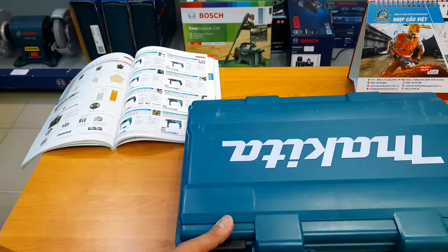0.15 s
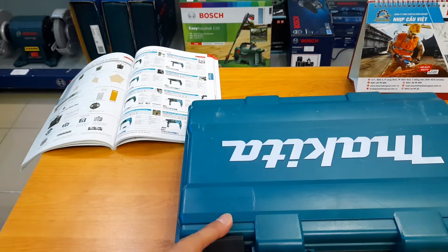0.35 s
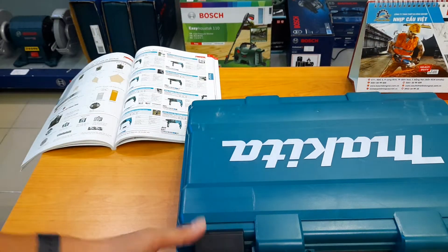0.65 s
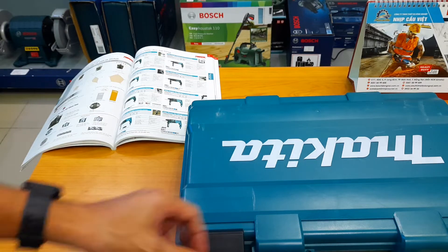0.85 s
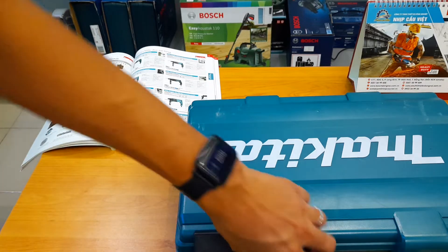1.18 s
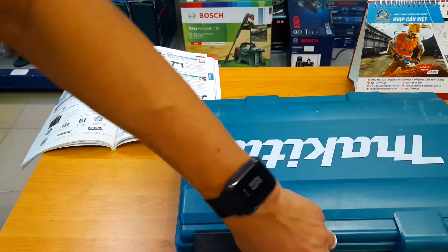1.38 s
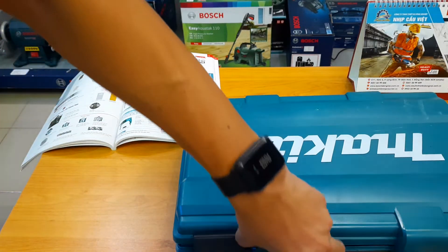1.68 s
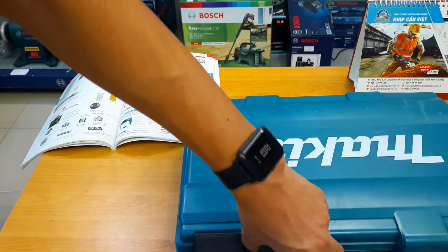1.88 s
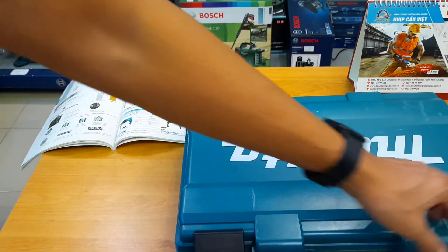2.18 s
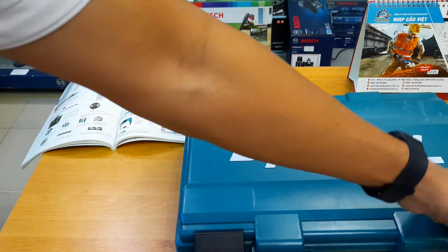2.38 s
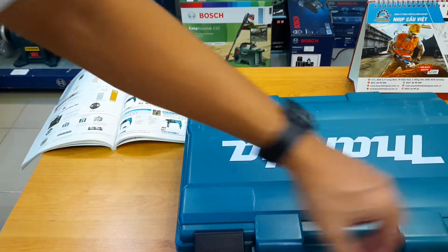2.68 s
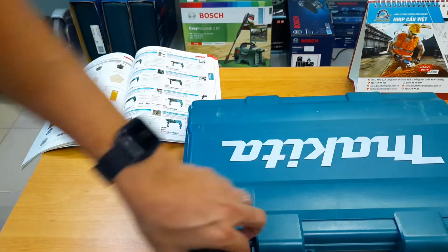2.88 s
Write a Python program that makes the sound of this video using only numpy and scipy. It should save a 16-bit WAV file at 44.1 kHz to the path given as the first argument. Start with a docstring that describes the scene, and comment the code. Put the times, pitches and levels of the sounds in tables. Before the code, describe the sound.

Hard plastic case latches unsnap close to a hand-held camera: faint finger taps, a sharp snap, a latch ping, handling bumps, then more hollow snaps and light ticks, over soft ventilation in a reverberant shop.

```python
"""Over a low ventilation hush and hum, a faint skin squeak and finger taps lead to the first snaps of a
hard plastic tool case, close to a hand-held camera. A latch ping and taps follow, then bumps and a squeak,
then more snaps with taps and bumps between them, and last a few light ticks.
Snaps and taps are short noise cracks that ring a hollow shell of decaying sines and noise; a long noise
tail is the shop's answer. Squeaks are narrow noise; handling is dull noise and short low swings."""
import sys
import numpy as np
from scipy import signal
from scipy.fft import rfft, irfft, next_fast_len
from scipy.io import wavfile

SR = 44100
rng = np.random.default_rng(int(sys.argv[2]) if len(sys.argv) > 2 else 0)


def dump(signal):
    """Clip the signal to [-1, 1] and save it as 16-bit WAV at the path in sys.argv[1]."""
    limited = np.clip(np.atleast_2d(signal).T, -1, 1)
    pcm = np.round(limited * 32767).astype(np.int16)
    wavfile.write(sys.argv[1], SR, pcm)


N = 134505  # length of the scene [samples]
FFT_SIZE = 65536  # [samples]
TOP_HZ = 16200  # nothing is kept from here up

# how alike left and right are in the sound straight from the case: (frequency [Hz], likeness [0-1])
DIRECT_LIKENESS = [(250, 1), (1000, 0.75), (2200, 0.087), (5000, 0.14), (12000, 0.061)]
# how alike left and right are in the room's sound: (frequency [Hz], likeness [0-1])
ROOM_LIKENESS = [(100, 1), (290, 0.95), (640, 0.19), (1400, 0), (12000, 0.027)]


def amp(db):
    """Turn decibels into a gain."""
    return 10 ** (np.asarray(db) / 20)


def fade(t, t60):
    """Exponential decay by 60 dB in t60 seconds."""
    return np.exp(-np.log(1000) * t / t60)


def unit(x):
    """Scale x to an rms of 1."""
    return x / np.sqrt(np.mean(x ** 2) + 1e-20)


def unit_energy(x):
    """Scale x to an energy of 1, averaged over its channels."""
    return unit(x) / np.sqrt(x.shape[-1])


def along(points, hz):
    """Read values between (frequency [Hz], value) points on a log frequency axis."""
    f, v = np.transpose(points)
    return np.interp(np.log(hz + 1), np.log(f + 1), v)


def bell(x, centre, width):
    """A smooth hump of height 1 that falls to 1/e at one width from its centre."""
    return np.exp(-((x - centre) / width) ** 2)


def pan(db):
    """Left and right gains; a positive level difference makes the left louder."""
    return amp(np.array([[db], [-db]]) / 2)


def add(out, s, x):
    """Mix x into out from time s."""
    i = max(0, round(s * SR))
    out[:, i:i + x.shape[-1]] += x[..., :N - i]


def noise(size, alike, tone=None):
    """Stereo noise of rms 1 with a given left-right likeness and colour."""
    m = next_fast_len(size)
    hz = np.fft.rfftfreq(m, 1 / SR)
    # share each frequency between a common part and an opposite part
    turn = np.arccos(np.clip(along(alike, hz), -1, 1)) / 2
    gain = amp(along(tone, hz)) if tone else 1
    spectrum = rfft(rng.standard_normal((2, m))) * gain
    mid, side = irfft(spectrum * [np.cos(turn), np.sin(turn)], m)[:, :size]
    return unit(np.array([mid + side, mid - side]))


def dying(x, t60s):
    """Each frequency of x dies at its own speed and keeps its share of the energy."""
    hz, t, z = signal.stft(x, SR, nperseg=256)
    t60 = along(t60s, hz)[:, None]
    faded = z * fade(t, t60) / np.sqrt(t60)
    return unit_energy(signal.istft(faded, SR, nperseg=256)[1][:, :x.shape[1]])


def causal(x, gain):
    """Filter x by a gain per frequency, with no sound ahead of the blow (minimum phase)."""
    cep = irfft(np.log(gain))
    cep[1:FFT_SIZE // 2] *= 2
    cep[FFT_SIZE // 2 + 1:] = 0
    return irfft(rfft(x, FFT_SIZE) * np.exp(rfft(cep)))[:, :x.shape[1]]


def ventilation():
    """The shop's steady hush is coloured noise; its slightly unsteady hum is a sine that drifts in phase."""
    # colour of the hush: (frequency [Hz], relative level [dB per Hz])
    hush_tone = [(20, -23), (50, -11), (100, -2.5), (170, -9), (420, -7), (760, -14), (2100, -18.5),
                 (4300, -31.5), (12300, -33), (16000, -40)]
    hush_db, hum_hz, hum_db = -46.5, 108, -53
    drift = np.cumsum(rng.standard_normal(N)) / np.sqrt(SR)
    hum = np.sin(2 * np.pi * (hum_hz * np.arange(N) / SR + drift))
    return amp(hush_db) * noise(N, ROOM_LIKENESS, hush_tone) + amp(hum_db) * hum


def handling():
    """Dull rumble and soft low swings, different at each microphone port."""
    # level of the handling rumble before panning: (time [s], level [dB])
    rumble_level = [(0, -65), (.8, -64), (.89, -46.5), (1.02, -54), (1.1, -42), (1.3, -47.5), (1.4, -38.5),
                    (1.56, -39.5), (1.65, -46), (1.9, -41), (2.06, -40), (2.23, -46), (2.3, -32),
                    (2.44, -30.5), (2.6, -57), (2.72, -47.5), (2.8, -36.5), (3.05, -58)]
    # colour of the rumble: (frequency [Hz], relative level [dB])
    rumble_colour = [(20, -40), (50, -2), (90, 1.5), (150, -9), (300, -13), (900, -53.5)]
    # bumps on the ports: (time [s], frequency [Hz], half length [s], left level [dB], right level [dB])
    port_bumps = [(1.344, 82, 0.019, -23, -42), (1.4669, 158, 0.0015, -41, -9.5),
                  (1.53, 134, 0.0031, -43, -13), (2.09, 108, 0.018, -39, -22.5),
                  (2.286, 89.5, 0.0081, -40, -18), (2.338, 104.3, 0.02, -43, -18),
                  (2.397, 80, 0.0078, -28, -17.5), (2.414, 116, 0.007, -38, -20.5),
                  (2.783, 114, 0.0073, -53, -17)]
    t = np.arange(N) / SR
    level = amp(np.interp(t, *np.transpose(rumble_level)))
    out = level * noise(N, [(100, 0.092)], rumble_colour) * pan(-11.5)
    for s, hz, half_s, left_db, right_db in port_bumps:
        swing = np.cos(2 * np.pi * (hz * (t - s) + rng.random((2, 1))))
        out += amp([[left_db], [right_db]]) * swing * bell(t, s, half_s)
    return out


def squeaks():
    """Skin slides over the plastic: a faint, rough whistle that swells and fades, made of narrow noise."""
    # (time [s], length [s], frequency [Hz], half width [Hz], level before the swell [dB])
    skin_slides = [(0.038, 0.14, 11380, 220, -58), (1.46, 0.061, 5100, 170, -59)]
    out = np.zeros((2, N))
    for s, length_s, hz, width_hz, db in skin_slides:
        n = round(length_s * SR)
        band = bell(np.fft.rfftfreq(n, 1 / SR), hz, width_hz)
        whistle = unit(irfft(rfft(rng.standard_normal((2, n))) * band, n))
        add(out, s, amp(db) * np.hanning(n) * whistle)
    return out


def shop():
    """A fresh one-second answer of the room: spread-out noise that rises fast and dies slowly."""
    # decay of the room: (frequency [Hz], time to fall 60 dB [s])
    room_decay = [(150, 0.68), (400, 0.74), (1000, 0.8), (2500, 0.75), (7000, 0.73), (14000, 0.47)]
    # colour of the room: (frequency [Hz], relative level [dB])
    room_colour = [(150, -2), (500, 3), (2000, 0.5), (4500, 0), (9000, -3), (15000, -6.5)]
    delay_s, rise_s = 0.0029, 0.0014
    t = np.arange(SR) / SR
    rise = 1 - np.exp(-np.maximum(t - delay_s, 0) / rise_s)
    return unit_energy(rise * dying(noise(SR, ROOM_LIKENESS, room_colour), room_decay))


def cracking(t, slip_s):
    """A toneless burst that holds for the slip and then dies away fast."""
    ripple = 0.6  # smaller gives a more even spectrum
    burst = unit_energy(noise(len(t), DIRECT_LIKENESS) * fade(np.maximum(t - slip_s, 0), 0.012))
    power = np.mean(np.abs(rfft(burst, FFT_SIZE)) ** 2, axis=0)
    return unit_energy(causal(burst, 1 / np.sqrt(power + ripple)))


def shell_modes(t):
    """The hollow shell rings at its own pitches, each a dying sine with a slightly random level."""
    # (frequency [Hz], typical relative level [dB], time to fall 60 dB [s])
    shell_table = [(235.4, -3, 0.16), (262.7, 3, 0.16), (296, -3, 0.33), (315.3, 0.5, 0.31),
                   (336, -1.5, 0.3), (436.5, 0, 0.3), (543.6, 3, 0.15), (606.6, 4, 0.15), (836, 6.5, 0.057),
                   (887, 1, 0.28), (960, -12, 0.2), (1135, -2.5, 0.14), (1950, -5.5, 0.34)]
    modes = np.zeros(len(t))
    for k, (hz, db, t60) in enumerate(shell_table):
        sign = (-1) ** (k // 3)  # flips after every three modes
        level = amp(db + 2 * rng.standard_normal())
        modes += sign * level * np.sin(2 * np.pi * hz * t) * fade(t, t60)
    return unit_energy(modes)


def coloured(x, octaves, bass_db, peaks):
    """Give a blow of unit energy its (Hz, dB) octave levels and its resonances."""
    # fall of the bass: (frequency [Hz], level against the lowest octave, before the bass setting [dB])
    bass_slope = [(40, -18), (110, -8.5), (170, -1.5)]
    top_fall_db = -8.5  # at the band limit, against the highest octave
    hz = np.fft.rfftfreq(FFT_SIZE, 1 / SR)
    bass = [(f, octaves[0][1] + db + bass_db) for f, db in bass_slope]
    top = [(TOP_HZ, octaves[-1][1] + top_fall_db)]
    level_db = along(bass + octaves + top, hz)
    level_db = level_db + sum(db * bell(hz, centre, width) for centre, width, db in peaks)
    # higher octaves are wider, so each hertz in them gets less
    return causal(x, amp(level_db) * SR / np.sqrt(140 * (hz + 20)))


def contact(slip_s, room_db, shell_db, octaves, bass_db=0, peaks=()):
    """Plastic slips for a moment and cracks; the shell rings on, and the room answers both."""
    # decay of the crowded higher modes: (frequency [Hz], time to fall 60 dB [s])
    dense_decay = [(200, 0.084), (1000, 0.2), (2200, 0.043), (5000, 0.13), (12000, 0.025)]
    # colour of the crowded higher modes: (frequency [Hz], relative level [dB])
    dense_colour = [(1000, -1.5), (2500, -1), (6000, -14), (14000, -12)]
    dense_db, shell_base_db = -4, -19.5  # against the crack, before the ring's build-up
    t = np.arange(SR // 3) / SR
    crack = cracking(t, slip_s)
    dense = amp(dense_db) * dying(noise(len(t), DIRECT_LIKENESS, dense_colour), dense_decay)
    modes = amp(shell_base_db + shell_db) * shell_modes(t)
    build_up = 1 - np.exp(-2 * t / slip_s)
    ring = (dense + modes) * build_up
    size = np.linalg.norm(crack + ring) / np.sqrt(2)
    # the room hears a click for the crack, plus the ring 4.5 dB lower
    radiated = unit_energy((t == 0) + amp(-4.5) * ring[:1] / size)
    heard = amp(room_db) * signal.fftconvolve(radiated, shop(), axes=1)[:, :SR]
    heard[:, :len(t)] += (crack + ring) / size * pan(2)
    return coloured(heard, octaves, bass_db, peaks)


def fingers():
    """Fingers and loose latches tap and tick on the same shell."""
    # middles of the tap octaves: frequency [Hz]
    tap_octaves = [300, 1000, 2300, 4500, 11000]
    # (time [s], slip [s], then one level for each tap octave [dB])
    tap_table = [ (.155, 0.0069, -43, -42, -41.5, -50, -49.5),
                 (.2121, 0.0026, -34, -43.5, -34, -46.5, -39.5),
                 (0.4794, 0.0023, -39.5, -34, -35.5, -39.5, -46), (.582, 0.0038, -36.5, -39, -39, -66, -62),
                 (.613, 0.0014, -36.5, -48, -47, -56, -58), (0.666, 0.0038, -54, -39.5, -42, -61, -51),
                 (1.07, .0025, -27.5, -57, -53, -48.5, -49), (1.077, 0.0075, -32, -36, -36.5, -51, -51),
                 (1.1006, 0.0021, -37, -55, -40, -58, -55), (1.106, 0.0024, -30, -40.5, -37, -53, -57),
                 (1.1123, 0.0031, -49, -39, -33.5, -41, -55), (1.241, 0.00094, -32, -40.5, -50.5, -65, -58),
                 (2.154, 0.0067, -42, -31, -35, -44.5, -44.5),
                 (2.328, 0.0028, -39.5, -40, -47.5, -43.5, -45.5),
                 (2.408, .0104, -36, -39.5, -34.5, -55, -65),
                 (2.8856, 0.0022, -36.5, -40.5, -37.5, -58.5, -42),
                 (2.9023, 0.0018, -43, -44.5, -51, -42.5, -41.5)]
    out = np.zeros((2, N))
    for s, slip_s, *levels in tap_table:
        add(out, s, contact(slip_s, room_db=-6, shell_db=0, octaves=list(zip(tap_octaves, levels))))
    return out


def pings():
    """The latch pieces ring briefly as dying sines, straight to the ear and through the room."""
    # (time [s], frequency [Hz], level before panning and build-up [dB], time to fall 60 dB [s])
    ping_table = [(0.4797, 2190, -6, 0.0099), (1.691, 2445, -35, 0.097), (2.3571, 2600, -30.5, 0.11),
                  (2.3568, 5555, -48, 0.22), (2.4588, 5590, -54, 0.28)]
    out, t = np.zeros((2, N)), np.arange(SR // 4) / SR
    for s, hz, db, t60 in ping_table:
        build_up = 1 - np.exp(-t / 0.00053)
        ping = amp(db) * np.sin(2 * np.pi * hz * t) * fade(t, t60) * build_up
        add(out, s, ping * pan(7))
        add(out, s, amp(-7.5) * signal.fftconvolve(ping[None], shop(), axes=1))
    return out


def snaps():
    """Latches let go and slap the case; each strike point favours one resonance of the shell."""
    # middles of the snap octaves: frequency [Hz]
    snap_octaves = [270, 550, 1000, 2000, 4000, 9000]
    # (time [s], slip [s], room level [dB], shell ring change [dB], favoured resonance [Hz],
    #  deep bass change [dB], share of latch colour [0-1], then one level for each snap octave [dB])
    snap_table = [ (0.2395, 0.00082, -2.5, 11, 241, -0.5, 0.58, -37, -33.5, -22.5, -16, -30, -29.5),
                  (.2459, 0.0028, -4.5, 3.5, 228, 0, 0.26, -22.5, -27.5, -17, -32, -21, -26.5),
                  (.252, 0.00096, -3.5, 4, 324, -10, 0.11, -25.5, -31.5, -34.5, -18.5, -50, -38),
                  (1.6905, 0.0044, -4.5, -21, 265, -7.5, 0.0073, -30, -43, -26.5, -23.5, -31.5, -27),
                  (1.695, 0.0014, -3.5, 14, 253, -17.5, 0.18, -24.5, -33, -26.5, -31.5, -37, -40),
                  (1.7225, 0.0042, -6.5, 5.5, 554, -10.5, 0.2, -27.5, -29, -42, -29, -36, -54),
                  (1.9319, 0.002, -4.5, 3, 427, -2.5, 0.3, -24, -31, -22, -22.5, -38.5, -30),
                  (1.945, 0.013, -6, 0, 151, -3.5, 0, -30.5, -42, -28.5, -24.5, -35, -43),
                  (1.9549, 0.0047, -14, 12, 820, 10.5, 0, -34, -27, -33, -27.5, -41, -44),
                  (2.3564, 0.0014, -4.5, 8, 5400, -3, 0.31, -39.5, -35, -42.5, -33, -34.5, -29),
                  (2.4604, 0.0033, -3, 3.5, 532, -5, 1, -29, -29, -19.5, -24, -23.5, -24)]
    # full colour of the stiff latch piece: (frequency [Hz], half width [Hz], change [dB])
    latch_colour = [(2210, 160, 8.5), (3520, 490, 2), (5000, 270, -7), (5600, 110, 5.5), (6150, 130, -2)]
    boom_db, boom_width = 7, 0.13  # lift of the favoured resonance; half width as a share of its frequency
    out = np.zeros((2, N))
    for s, slip_s, room_db, shell_db, boom_hz, bass_db, share, *levels in snap_table:
        peaks = [(boom_hz, boom_hz * boom_width, boom_db)]
        peaks += [(hz, width, share * db) for hz, width, db in latch_colour]
        octaves = list(zip(snap_octaves, levels))
        add(out, s, contact(slip_s, room_db, shell_db, octaves, bass_db, peaks))
    return out


def scene():
    """Mix all sources, from the background to the latches."""
    return ventilation() + handling() + squeaks() + fingers() + pings() + snaps()


def record(dry):
    """The camera cuts the deepest bass, rounds off the highest peaks and keeps nothing above its band limit."""
    low_cut_hz, clip_top = 38, 1
    lean = signal.sosfilt(signal.butter(2, low_cut_hz, "high", fs=SR, output="sos"), dry)
    held = lean / (1 + np.abs(lean / clip_top) ** 6) ** (1 / 6)
    m = next_fast_len(N + SR // 2)
    in_band = np.fft.rfftfreq(m, 1 / SR) < TOP_HZ
    return irfft(rfft(held, m) * in_band, m)[:, :N]


dry = scene()
out = record(dry)
dump(out)
```